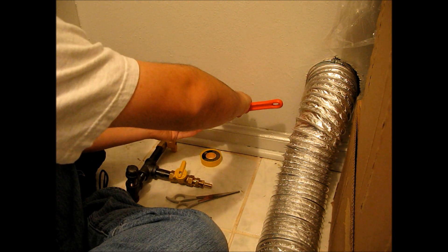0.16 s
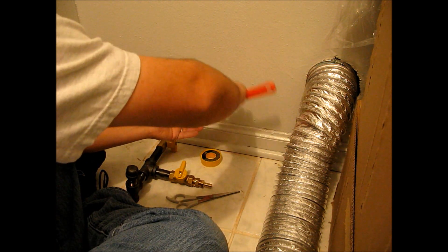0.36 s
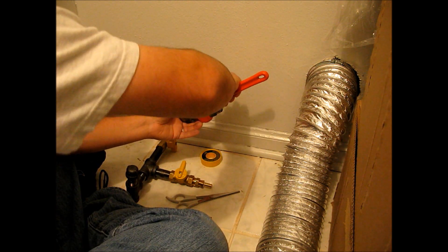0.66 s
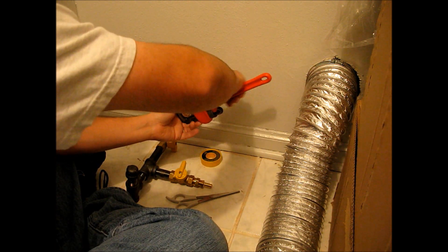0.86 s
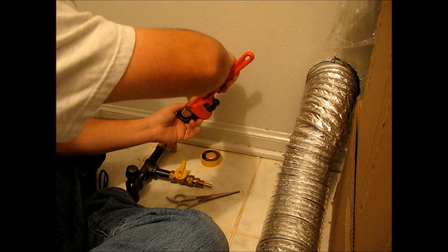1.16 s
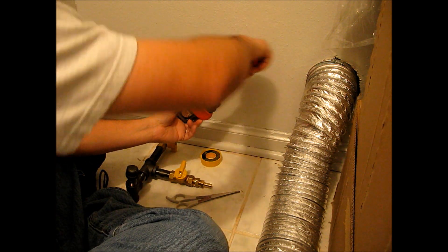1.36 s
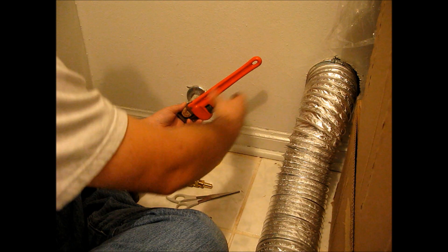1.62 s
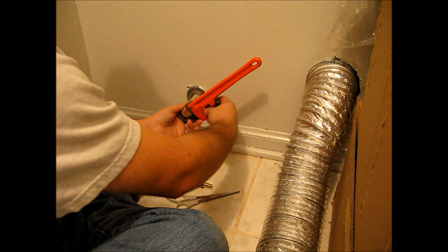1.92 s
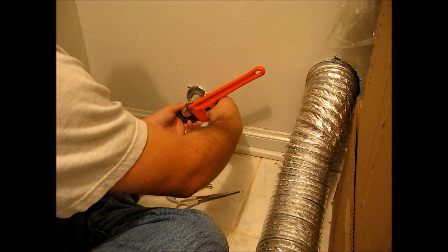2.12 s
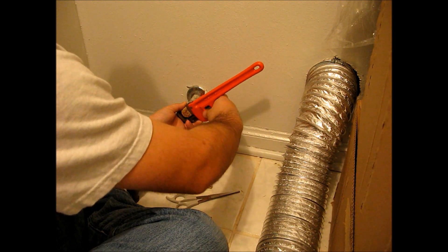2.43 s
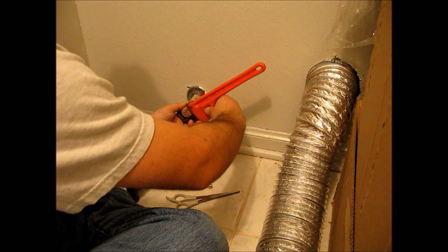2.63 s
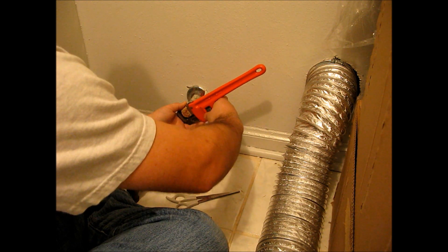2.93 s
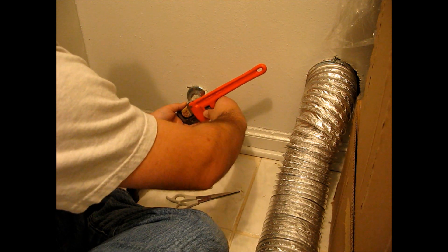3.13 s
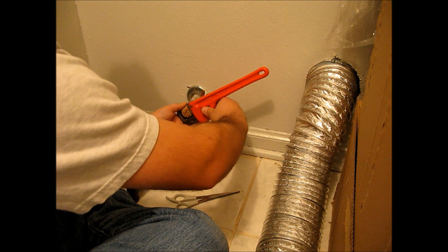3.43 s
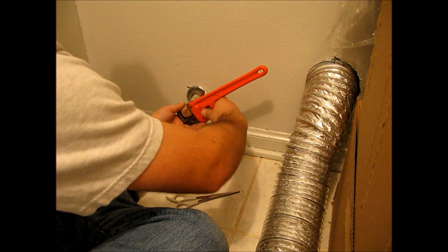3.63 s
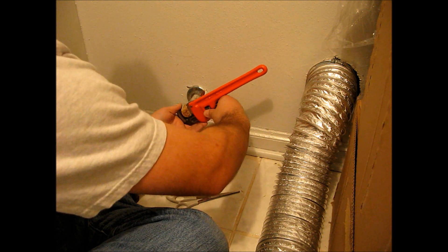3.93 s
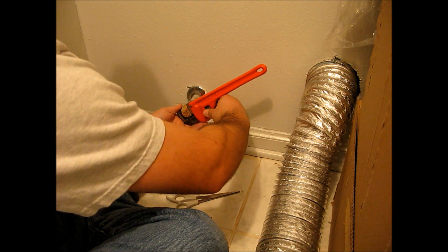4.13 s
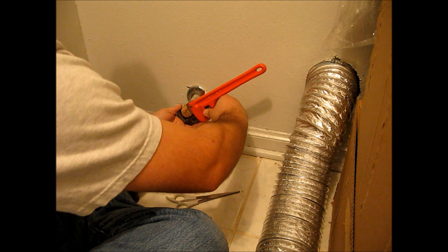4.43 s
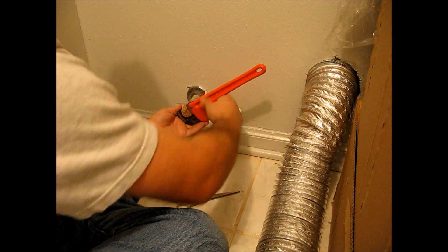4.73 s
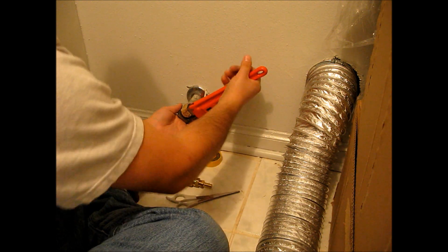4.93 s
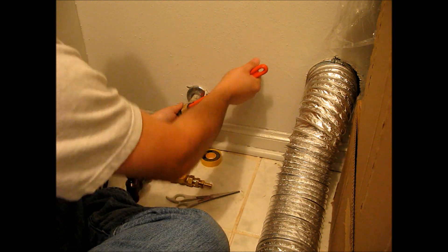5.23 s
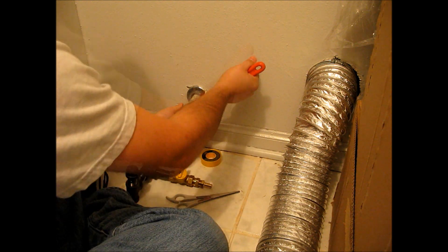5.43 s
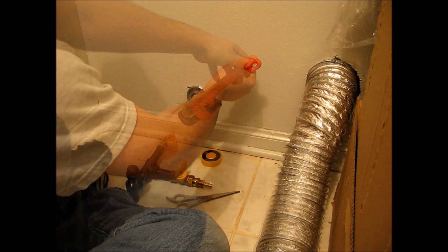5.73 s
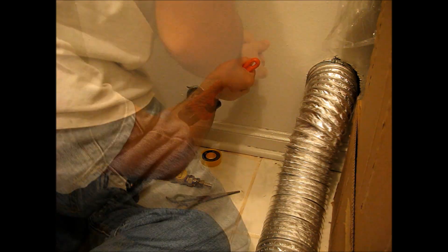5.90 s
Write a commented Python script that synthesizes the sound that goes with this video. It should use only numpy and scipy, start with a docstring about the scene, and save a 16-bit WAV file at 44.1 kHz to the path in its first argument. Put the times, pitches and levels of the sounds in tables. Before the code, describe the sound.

Hollow pipe knocks and a gritty judder, two sharp ringing jaw clinks, small ticks and skin rubs over steady soft hiss and low hum.

```python
"""Pipe wrench on a capped pipe stub

A steel pipe wrench is worked on a capped pipe stub that sticks out of the wall of a small utility room.
Pulls on the handle thump the pipe in the hollow wall: smooth force pulses excite decaying modes.
The loose jaw clinks (struck modes) and scrapes (stick-slip noise) as it is reset; tight threads judder.
Hands and sleeves brush over the tool as shaped noise. Behind it lie a steady hiss, faint fan tones,
a faint mains hum that swells and fades, and briefly a low tone."""
import sys
import numpy as np
from scipy import signal
from scipy.fft import rfft, irfft
from scipy.io import wavfile
from scipy.ndimage import uniform_filter1d

SR = 44100
rng = np.random.default_rng(int(sys.argv[2]) if len(sys.argv) > 2 else 0)


def transcribe(u):
    """Save the signal u as a 16-bit wav file named by the first command-line argument.

    u: samples, shape (n,) or (channels, n), limited to [-1, 1]; the rate is SR.
    q: integer samples, one column per channel.
    """
    v = np.clip(np.atleast_2d(u).T, -1, 1)
    q = np.round(v * 32767).astype(np.int16)
    wavfile.write(sys.argv[1], SR, q)


N = 267246
TIME = np.arange(N) / SR
RING = TIME[:SR]  # one second, for struck sounds
FREQ = np.fft.rfftfreq(N, 1 / SR)

# the jaw strikes the cap and shoves the pipe: start_s, level_db, jaw_pitch_factor, handle_ring_db,
# favoured_mode_hz (handle mode favoured by the spot struck), shove_drive_db
CLINKS = [(1.3517, -9, 0.98, 0.5, 7250, -36.5), (1.418, -44, .99, -2, 9700, -54),
          (1.569, -48.5, 0.98, -6, 1320, -32.5), (1.8772, -34, .977, 6, 5230, -38),
          (2.0244, -39.5, .99, -10, 6255, -53), (2.203, -40, 1.2, 4, 7300, -39.5),
          (2.257, -11, 1.012, -8, 5020, -29), (2.572, -30.5, 1, 7, 1320, -37),
          (2.655, -41.5, 1.01, 8, 6255, -52)]
# modes of the loose jaw, before the pitch and decay factors of a blow: pitch_hz, level_db, t60_s
JAW_MODES = [(3245, 0, .045), (3242, -21, .27), (2820, -21, .09), (3100, -12, .04), (3430, -16, .04)]
# modes of the handle and frame, before the decay factor of a blow: pitch_hz, level_db, t60_s
HANDLE_MODES = [(5020, -25, .08), (5230, -29, .08), (6255, -26, .12), (7330, -29, .09), (1320, -27, .07),
                (1635, -24, .07), (2040, -28, .07), (2650, -24, .08), (6880, -30, .06), (7190, -31, .07),
                (9000, -33, .06), (9700, -36, .08), (12030, -34, .08)]


def gain_of(db):
    """The decibel is logarithmic: 20 dB is a factor of ten in amplitude."""
    return 10 ** (np.asarray(db) / 20)


def evened(x):
    """Normalisation by signal power: scales to an rms of one."""
    return x / np.sqrt(np.mean(x ** 2) + 1e-20)


def read(points, hz):
    """Interpolates a spectrum on a logarithmic frequency axis."""
    f, value = np.transpose(points)
    return np.interp(np.log(hz + 1), np.log(f + 1), value)


def add(mix, s, sound):
    """Superposition: mixes a sound in at time s."""
    part = mix[max(round(s * SR), 0):][:len(sound)]
    part += sound[:len(part)]


def fade(t60):
    """Exponential decay: 60 dB lost in t60 seconds."""
    return np.exp(-np.log(1000) * RING / t60)


def onset(rise):
    """Exponential approach to full level, with time constant rise in seconds."""
    return 1 - np.exp(-RING / rise)


def colour(x, points):
    """Linear filtering by a spectrum in dB, at an rms of one."""
    gain = gain_of(read(points, np.fft.rfftfreq(len(x), 1 / SR)))
    return evened(irfft(rfft(x) * gain, len(x)))


def band(x, hz, octaves):
    """One broad resonance with gentle skirts on the octave scale, at an rms of one."""
    away = np.log2((np.fft.rfftfreq(len(x), 1 / SR) + 1) / hz) / octaves
    return evened(irfft(rfft(x) / (1 + away ** 2), len(x)))


def wavering_tone(hz, width_hz):
    """Narrow-band noise: a tone whose amplitude and phase wander, at an rms of one."""
    spectrum = rfft(rng.standard_normal(N))
    return evened(irfft(spectrum / (1 + ((FREQ - hz) / width_hz) ** 2), N))


def grains(size, per_s, spread_db):
    """Shot noise: tiny slips at random moments and of uneven strength, at an rms of one."""
    chance = rng.random(size)
    kick, strength = rng.standard_normal((2, size))
    return evened((chance < per_s / SR) * kick * gain_of(spread_db * np.clip(strength, -2, 2)))


def stroke(start, top, end):
    """Speed of a slide that accelerates to its peak and stops, as quarter sines."""
    return np.sin(np.pi / 2 * np.interp(TIME, np.sort([start, top, end]), [0, 1, 0]))


def ring(modes, pitch=1, decay=1):
    """Modal synthesis: a struck body sounds as a sum of dying sines."""
    return sum(gain_of(db) * fade(t60 * decay) * np.sin(2 * np.pi * hz * pitch * RING)
               for hz, db, t60 in modes)


def background():
    """Background: even hiss, wavering tones of a distant fan, and a mains-hum sine that swells and fades."""
    # hiss spectrum: pitch_hz, level_db (per Hz)
    hiss_spectrum = [(12, -41), (20, -12.5), (65, 0), (98, -7.5), (130, -1), (177, -8), (248, -9.5),
                     (367, -9.5), (558, -12.5), (660, -12.5), (780, -13), (849, -9.5), (949, -14.5),
                     (6360, -22), (16000, -29.5)]
    # fan tones: pitch_hz, width_hz, level_db
    fan_tones = [(533, 5.3, -73), (671, 9.4, -68), (853, 8.3, -69.5)]
    # hum level over time: time_s, level_db (rms)
    hum_levels = [(0, -75), (3.2, -83), (3.6, -52.5), (3.9, -61), (4.7, -61), (5.2, -55), (5.55, -48),
                  (6.06, -48.5)]
    hiss_db, hum_hz = -49.5, 60.6
    hiss = gain_of(hiss_db) * colour(rng.standard_normal(N), hiss_spectrum)
    fan = sum(gain_of(db) * wavering_tone(hz, width) for hz, width, db in fan_tones)
    hum_gain = gain_of(np.interp(TIME, *np.transpose(hum_levels)))
    hum = hum_gain * np.sqrt(2) * np.sin(2 * np.pi * hum_hz * TIME)
    return hiss + fan + hum


def hands():
    """Sliding friction: skin hisses over the painted handle and the sleeve rustles."""
    # skin sliding along the handle: start_s, strongest_s, end_s, level_db
    rubs = [(1.17, 1.38, 1.6, -43.5), (4.7, 4.815, 4.99, -46), (4.84, 4.889, 5.04, -44.5),
            (5.25, 5.303, 5.37, -54), (5.585, 5.61, 5.66, -55)]
    # spectrum of skin on paint: pitch_hz, level_db (per Hz)
    skin_spectrum = [(1500, -22), (4000, -5.5), (8000, -4.5), (11000, 0), (13500, 1.5), (16000, -5)]
    # the sleeve swishes as the arm swings: strongest_s, level_db
    swishes = [(.84, -58.5), (1.111, -54.5), (5.25, -60.5), (5.86, -58), (6.05, -58)]
    # spectrum of cloth: pitch_hz, level_db (per Hz)
    cloth_spectrum = [(30, -22), (150, 3.5), (600, 2), (1200, -0.5), (2100, 1), (3500, -2.5), (7000, -8.5),
                      (12000, -10), (16000, -29)]
    half_s, rest_db = 0.14, -56.5  # rise or fall of a swish; the rustle that never stops
    grip = sum(gain_of(db) * stroke(start, top, end) ** 4.7 for start, top, end, db in rubs)
    skin = grip * colour(grains(N, per_s=7000, spread_db=0.0), skin_spectrum)
    swing = sum(gain_of(db) * stroke(s - half_s, s, s + half_s) ** 2 for s, db in swishes)
    cloth = colour(grains(N, per_s=4000, spread_db=0.5), cloth_spectrum)
    return skin + (gain_of(rest_db) + swing) * cloth


def push(contact):
    """Impact force: a smooth pulse of unit impulse; a longer contact is duller."""
    force = RING ** 2 * np.exp(-3 * np.pi * RING / contact)
    return force / force.sum()


def chance_times(per_s):
    """A jittered point process: random moments, each with a random deviation of unit spread."""
    gaps, size = rng.random((64, 2)).T
    times = np.cumsum(0.5 + gaps) / per_s
    return [(s, np.sqrt(12) * (u - 0.5)) for s, u in zip(times, size) if s < N / SR]


def contact_time(db):
    """Nonlinear contact stiffness: a harder blow has a shorter contact, halved for every 12 dB."""
    return 0.0054 * 2 ** ((-26 - db) / 12)  # 5.4 ms at -26 dB


def blows():
    """Impulsive drive of the pipe, as (s, drive dB, contact s, looseness dB): knocks, nudges and the jaw."""
    # pipe bumps in the wall: start_s, drive_db, looseness_db (rattle against the drive, before a common trim)
    bumps = [(0.011, -28, -3), (0.030, -25.5, -17), (0.0694, -18, -18), (0.0802, -25, -3),
             (0.0920, -14, -4), (0.259, -26.5, -17), (0.394, -22.5, -12), (0.41, -17.5, -15),
             (0.427, -19, -12.5), (0.448, -28, -2.5), (0.485, -26, -11), (0.636, -29.5, -11.5),
             (0.752, -30.5, -7), (0.996, -39, -18), (1.118, -26.5, -13), (2.132, -34, -6),
             (2.247, -31, 6.5), (2.7, -33.5, 4.5), (2.961, -34.5, -11.5), (3.135, -26, -5),
             (3.641, -34, -20), (3.99, -34, -24), (4.243, -34.5, -15), (4.766, -27.5, -13.5),
             (4.89, -23.5, -20), (5.648, -36.5, -6), (5.878, -32.5, -13)]
    shove_delay_s, shove_contact_s, shove_loose_db = 0.00299, 0.0036, 4.5
    knocked = [(s, db, contact_time(db), loose_db) for s, db, loose_db in bumps]
    # faint bumps while the tool is held, two per second
    nudges = [(s, -45 + 5.5 * size, 0.0054, -18) for s, size in chance_times(2)]
    shoves = [(s + shove_delay_s, db, shove_contact_s, shove_loose_db) for s, *_, db in CLINKS]
    return knocked + nudges + shoves


def judders(contact=0.0053):
    """Stick-slip: short runs of nearly even shoves, and the grating between them."""
    # tight threads judder as the cap turns: start_s, strongest_s, end_s, drive_db, slips_per_s, grating_db
    turns = [(0.059, 0.089, 0.091, -29, 200, -27.5), (0.376, 0.423, 0.451, -21.5, 155.8, -38.5),
             (1.048, 1.128, 1.15, -40, 134, -53), (2.627, 2.705, 2.74, -42.5, 132, -50),
             (4.807, 4.891, 4.91, -30, 115, -56)]
    # spectrum of the grating: pitch_hz, level_db (per Hz)
    grate_spectrum = [(60, -6), (400, 9), (850, 4.5), (1300, 9.5), (1700, 4), (2300, -1), (3300, -2.5),
                      (4500, -13), (7000, -14), (11000, -18.5), (16000, -38)]
    slip_jitter = 0.053  # rms share by which the slip rate wanders
    slips, speed = np.zeros((2, N))
    wander = evened(uniform_filter1d(rng.standard_normal(N), size=400))
    drift = np.cumsum(slip_jitter * wander) / SR
    for start, top, end, db, per_s, grate_db in turns:
        swell = stroke(start, top, end)
        warped = TIME - top + drift - np.interp(top, TIME, drift)
        slips += gain_of(db) * swell * np.diff(np.floor(warped * per_s), append=0)  # one impulse per cycle
        speed += gain_of(grate_db) * swell ** 2
    grating = speed * colour(grains(N, per_s=9000, spread_db=0.5), grate_spectrum)
    return signal.fftconvolve(slips, push(contact))[:N], grating


def knocks(wall_db=-3, leak_hz=70, rattle_db=-9, rattle_t60=0.11, rattle_rise=0.0053, pipe_db=-3):
    """Source and resonator: shoves ring the wall and shake the threads, which ring the pipe."""
    # pipe and hollow wall; the two shortest modes are the damped panel around the pipe:
    # pitch_hz, level_db, t60_s
    wall_modes = [(172, -1, .17), (214, -8, .15), (273, -5, .18), (146, -2, .04), (265, -4, .035),
                  (58, -15, .16), (78, -20, .12), (116, -13, .12), (135, -7, .12), (271, -35, 1.3),
                  (336, -16, .13), (391, -11, .17), (429, -10, .15), (487, -16, .15), (594, -12, .14)]
    # bending modes of the pipe stub: pitch_hz, level_db, t60_s
    pipe_modes = [(765, -4, .18), (844, 0, .17), (1139, 0, .12), (1320, -8, .07), (1385, 0, .11),
                  (1720, -10, .09), (2260, -10, .15)]
    # grit and loose threads rattling in a bump: pitch_hz, level_db (per Hz)
    rattle_spectrum = [(30, -42), (130, 7), (350, 2), (650, -2), (1000, -0.5), (1400, 0), (1700, -2),
                       (2700, -10), (4500, -25), (7000, -25.5), (11000, -29), (16000, -34)]
    pushes, rattles = judders()
    for s, db, contact, loose_db in blows():
        add(pushes, s, gain_of(db) * push(contact))
        grit = colour(grains(SR, per_s=9000, spread_db=2.5), rattle_spectrum)
        add(rattles, s, gain_of(db + loose_db + rattle_db) * grit * fade(rattle_t60) * onset(rattle_rise))
    thumps = gain_of(wall_db) * signal.fftconvolve(pushes, ring(wall_modes))[:N]
    # the panel radiates no deep bass
    thumps = signal.sosfilt(signal.butter(2, leak_hz, "high", fs=SR, output="sos"), thumps)
    sung = signal.fftconvolve(rattles, ring(pipe_modes))[:N]
    return thumps, rattles + gain_of(pipe_db) * rattles.std() * evened(sung)


def snap(hz, octaves, t60, rise=0.0005):
    """Sudden release of strain: a coloured noise burst that rises fast and decays exponentially."""
    return band(rng.standard_normal(SR), hz, octaves) * fade(t60) * onset(rise)


def ticks():
    """Broadband transients: snaps of teeth and grit, and the crack that starts every clink."""
    # teeth and grit snap with hardly any ring: start_s, level_db, centre_hz, width_octaves, t60_s
    snaps = [(0.0692, -40.5, 3300, 1.3, .09), (0.219, -48, 8550, 0.26, .025),
             (0.3372, -32, 9100, 1.34, .056), (0.6489, -41, 1950, .3, .035), (0.886, -46, 11000, 1, .25),
             (2.2, -32.5, 2400, .6, 0.039), (2.656, -41.5, 6200, .1, .08), (2.9057, -46.5, 6300, .6, 0.094),
             (3.691, -46.5, 11000, 2.5, .13), (4.2388, -48, 5000, .8, .08), (4.721, -40, 7000, 1.9, .063),
             (4.728, -34.5, 3180, 1.16, 0.073), (5.5929, -36.5, 11000, 2.7, .035),
             (5.6191, -43.5, 13000, .4, .13), (5.658, -41, 1970, 0.56, 0.051),
             (5.9095, -46, 11300, .23, 0.056)]
    crack_lead_s = 0.00046  # the crack comes just before the ring
    # the faintest snaps come at random, about one per second
    specks = [(s, -57 + 2 * size, 11500, 0.6, 0.068) for s, size in chance_times(1)]
    # first contact: its level grows by 0.6 dB for each dB of the blow
    cracks = [(s - crack_lead_s, -22.5 + 0.6 * db, 2220, 0.76, 0.074) for s, db, *_ in CLINKS]
    out = np.zeros(N)
    for s, db, hz, octaves, t60 in snaps + cracks + specks:
        add(out, s, gain_of(db) * snap(hz, octaves, t60))
    return out


def scrapes(jaw_db=-16):
    """Friction excitation: teeth catch and slip along the cap, partly ringing the wrench."""
    # the jaw slides on the cap: start_s, strongest_s, end_s, level_db, ring_share (0-1), centre_hz,
    # width_octaves
    slides = [(0.646, 0.649, 0.68, -46.5, .1, 2295, 0.03), (0.66, 0.77, 1.02, -58, 0.2, 2280, 0.12),
              (2.183, 2.205, 2.28, -42, 0.5, 2620, 1.6), (2.185, 2.22, 2.25, -55, 1, 7350, .08),
              (2.244, 2.251, 2.267, -41, 0.8, 6100, 0.13), (2.645, 2.69, 2.733, -43.5, 0.25, 5970, 0.81),
              (4.803, 4.835, 4.9, -46, 0.1, 2500, 1.2), (5.84, 5.875, 5.93, -54, .05, 2040, 0.21)]
    slips = grains(N, per_s=12000, spread_db=0.0)
    wrench = gain_of(jaw_db) * ring(JAW_MODES) + ring(HANDLE_MODES)
    rung = evened(signal.fftconvolve(slips, wrench)[:N])
    out = np.zeros(N)
    for start, top, end, db, share, hz, octaves in slides:
        grind = band(share * rung + (1 - share) * slips, hz, octaves)
        out += gain_of(db) * stroke(start, top, end) * grind
    return out


def clinks(rise=0.00094):
    """Modal impact of steel on steel, with one small bounce; the hand damps the ring quickly."""
    favour_db, favour_width_hz = 9.5, 220  # gain of the favoured mode and its close neighbours
    bounce_s, bounce_db = 0.024, -20  # the jaw falls back once: delay, level against the blow
    out = np.zeros(N)
    for s, db, pitch, handle_db, spot_hz, _ in CLINKS:
        # a hard blow seats the jaw: its ring halves for every 18 dB more
        decay = 0.6 * 2 ** ((-12.5 - db) / 18)
        handle = [(hz, mode_db + favour_db * np.exp(-((hz - spot_hz) / favour_width_hz) ** 2), t60)
                  for hz, mode_db, t60 in HANDLE_MODES]
        steel = ring(JAW_MODES, pitch, decay) + gain_of(handle_db) * ring(handle, decay=decay)
        steel = gain_of(db) * steel * onset(rise)
        add(out, s, steel)
        add(out, s + bounce_s, gain_of(bounce_db) * steel)
    return out


def low_tone():
    """Narrow-band noise under a slow swell: a faint low tone wavers."""
    # start_s, strongest_s, end_s, level_db, pitch_hz, width_hz
    start, top, end, db, hz, width = (1.5, 2.5, 3, -57, 262.5, 6)
    return gain_of(db) * stroke(start, top, end) * wavering_tone(hz, width)


def room(x, first_s=0.0044):
    """Reverberation from close walls: sparse early echoes with a decay time for each frequency."""
    # reverberation time: pitch_hz, t60_s
    decay_times = [(200, 0.2), (1000, 0.066), (3000, 0.19), (7000, 0.26), (15000, 0.13)]
    taps = rng.choice([-1., 1.], SR) * (rng.random(SR) < 3000 / SR) * (RING > first_s)
    hz, t, z = signal.stft(taps, SR, nperseg=256)
    decay = np.exp(-np.log(1000) * t / read(decay_times, hz)[:, None])
    tail = signal.istft(z * decay, SR, nperseg=256)[1]
    return signal.fftconvolve(x, tail / np.linalg.norm(tail))[:N]


def scene():
    """Superposition: all sources reach one microphone, the same in both channels."""
    thumps, rattles = knocks()
    steel = clinks()
    small = rattles + ticks() + scrapes()
    echoes = room(gain_of(-13) * steel + gain_of(-7.5) * small + gain_of(-8.5) * thumps)
    mono = thumps + steel + small + echoes + hands() + background() + low_tone()
    return np.array([mono, mono])


def record(dry):
    """Band limitation: a steep linear-phase low-pass filter at 15900 Hz."""
    low_pass = signal.firwin(511, 15900, window=("kaiser", 9), fs=SR)
    return signal.oaconvolve(dry, low_pass[None], "same")


dry = scene()
out = record(dry)
transcribe(out)
```